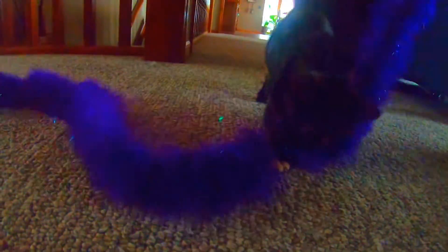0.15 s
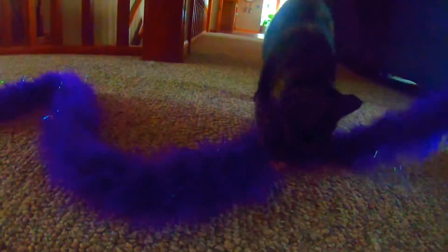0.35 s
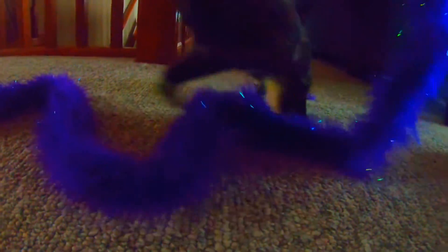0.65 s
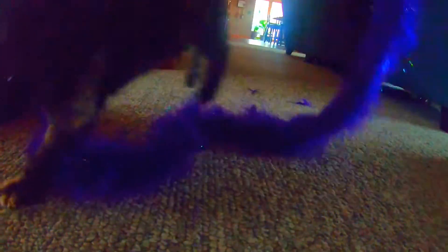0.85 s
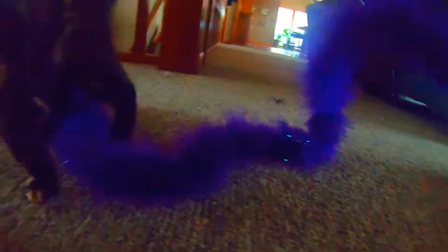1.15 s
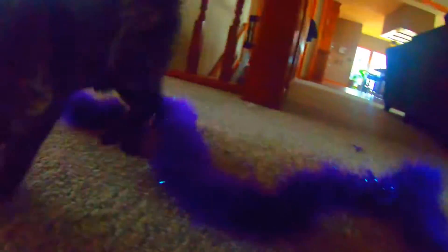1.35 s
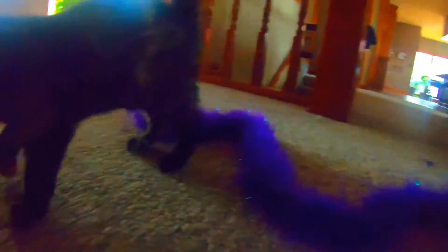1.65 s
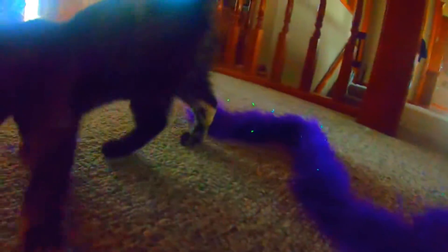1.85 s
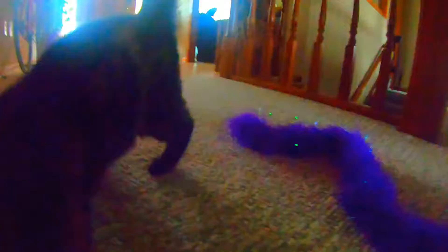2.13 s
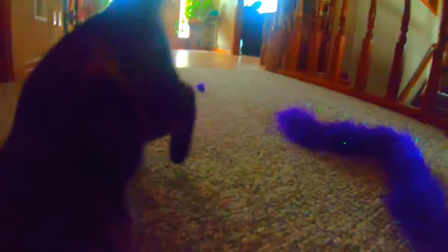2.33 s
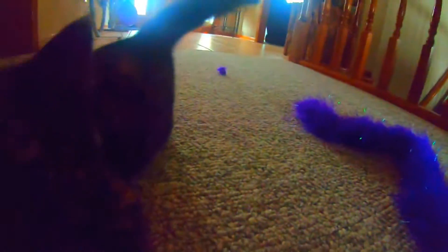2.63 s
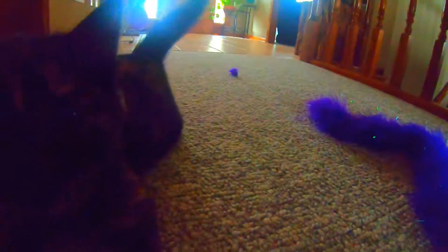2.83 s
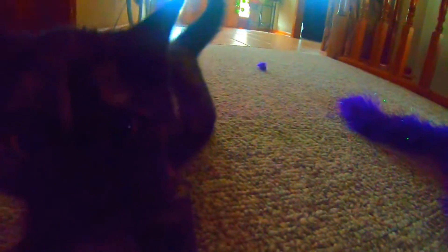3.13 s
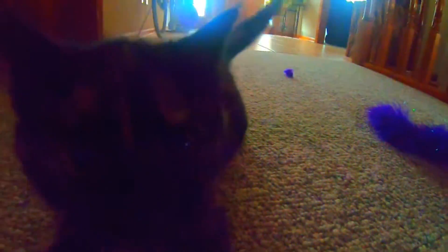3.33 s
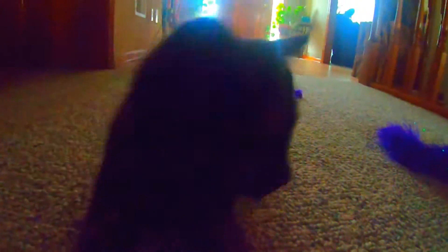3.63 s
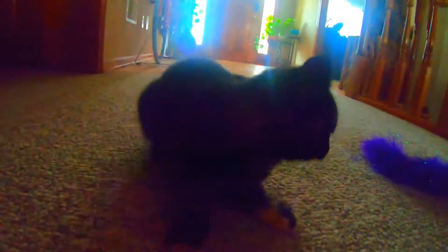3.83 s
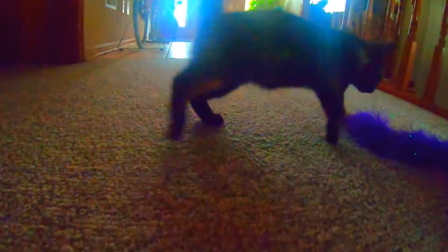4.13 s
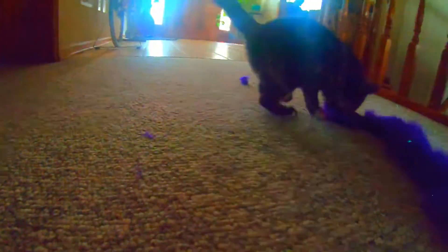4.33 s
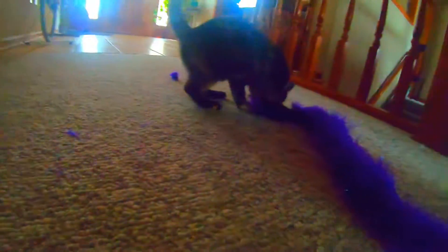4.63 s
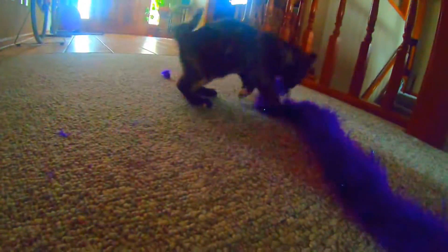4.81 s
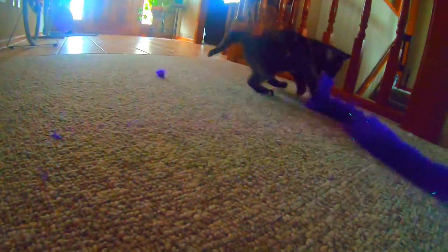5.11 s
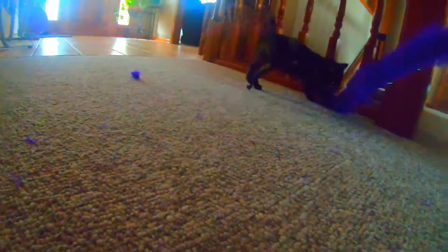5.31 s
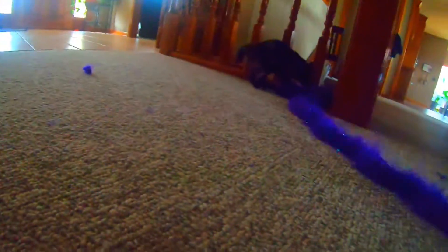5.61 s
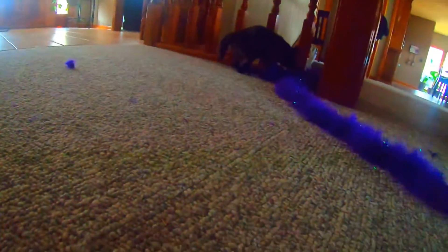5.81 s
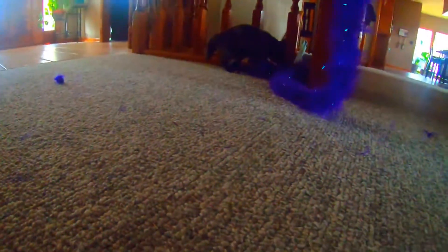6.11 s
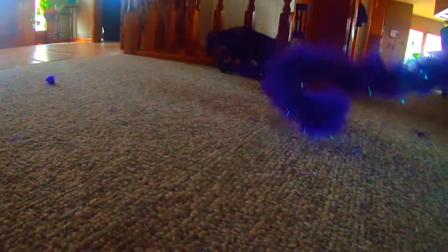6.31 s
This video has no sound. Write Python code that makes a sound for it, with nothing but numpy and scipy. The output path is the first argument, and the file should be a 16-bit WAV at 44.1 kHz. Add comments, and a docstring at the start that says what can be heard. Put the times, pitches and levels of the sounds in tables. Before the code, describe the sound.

Soft paw thumps and carpet scratches from a playing kitten, with close rubs and bumps on the microphone midway and a low household hum.

```python
"""Soft paws thud and scuff on carpet as a kitten chases a feather boa: claws snag the loops and the
boa zips over the ribs of the weave. It is all heard from a small camera held at floor level.
The kitten comes right up to it: fur and whiskers tap and rub the case, rasp over the microphone
ports and shove the camera in the hand. Then feathers rustle and the paws thud on.
Under it all the house hums."""
import sys
import numpy as np
from scipy import signal
from scipy.fft import rfft, irfft, next_fast_len
from scipy.io import wavfile

SR = 44100
rng = np.random.default_rng(int(sys.argv[2]) if len(sys.argv) > 2 else 0)


def unload_wav(signal):
    """Save mono or channel-first audio to the path in sys.argv[1] as 16-bit WAV at rate SR, clipped to [-1, 1]."""
    wavfile.write(
        sys.argv[1],
        SR,
        np.round(np.clip(np.atleast_2d(signal).T, -1, 1) * 32767).astype(np.int16),
    )


N = 284896
TIME = np.arange(N) / SR
ANTIPHASE = np.array([[1], [-1]])  # left and right in opposite polarity

# Levels in the tables are relative: each layer adds its own gain.
# Fur and whiskers tapping the case. Each row: start in seconds, knock level in dB, tick level in dB,
# tilt of the tick in dB per octave.
CASE_TAPS = [(2.2225, -46, -59, 4.5), (2.3395, -46, -56.5, 0.5), (2.3675, -33.5, -69.5, -1.5),
             (2.495, -46, -60, 9), (2.5215, -44, -71, -0.5), (2.6589, -42.5, -65, 0.5),
             (2.7138, -25, -60.5, 3), (2.7158, -41, -41, -2), (2.7328, -47.5, -64.5, 7),
             (2.778, -43.5, -64.5, -6), (2.7862, -35.5, -50, -21), (2.815, -42, -59.5, -2),
             (2.835, -46, -64, -4), (2.853, -45, -62, -8.5), (2.873, -45, -55, -11),
             (2.8925, -37, -55.5, -8.5), (2.909, -48, -62.5, -3), (2.923, -40.5, -56, -11),
             (2.937, -42.5, -72.5, -4), (2.985, -46.5, -61.5, -3), (3.02, -46, -68.5, -2),
             (3.033, -52.5, -68, -1.5), (3.134, -46, -66, -7), (3.364, -35.5, -57.5, -2),
             (3.4167, -41, -47.5, -3.5), (3.4268, -22.5, -23.5, 0.5), (3.4283, -25, -28, 2),
             (3.4395, -25.5, -46, -7), (3.4455, -36, -39.5, 0.5), (3.4595, -35.5, -52, -4),
             (3.527, -43.5, -62, -4), (3.534, -51, -59, 0), (3.549, -39, -64.5, 7), (3.564, -51.5, -55, -1),
             (3.569, -36.5, -57.5, 0), (3.58, -45, -63, 6.5), (3.603, -49.5, -68, 0),
             (3.612, -39.5, -66.5, -2), (3.619, -34.5, -61, 0), (3.626, -40.5, -59.5, 0),
             (3.646, -34.5, -70, -5), (3.654, -49, -52.5, -5.5), (3.66, -45.5, -59.5, 1),
             (3.669, -42.5, -64, -3), (3.6955, -36.5, -51.5, 0.5), (3.726, -40.5, -54.5, -2),
             (3.749, -37, -51.5, -1), (3.7527, -39, -53, 0), (3.7718, -28, -44.5, -2.5),
             (3.778, -27, -30.5, -3), (3.8101, -40, -55.5, 0), (3.8385, -28, -43.5, -8),
             (3.843, -25.5, -37, -1.5), (3.859, -27, -52, -4), (3.87, -28, -46, -3),
             (3.874, -28, -39.5, -3.5), (3.8842, -28.5, -51.5, -8), (3.94, -46, -70, 1),
             (4.538, -46, -64.5, -2), (4.653, -48.5, -62.5, 3.5)]
# Soft pads knocking on the case. Each row: start in seconds, level in dB.
PAD_KNOCKS = [(1.728, -50), (2.7168, -30), (4.356, -44), (4.506, -53), (4.604, -50), (5.308, -38),
              (5.412, -40.5), (5.856, -43.5), (5.9715, -37.5), (6.322, -42)]
# Fur and fingers sliding on the case. Each row: start and length in seconds, ring and hiss levels in dB.
CASE_RUBS = [(1.55, 0.036, -68, -67), (1.68, 0.071, -62, -81), (1.8, 0.13, -65.5, -90),
             (1.81, 0.047, -84, -70), (2.3, 0.1, -52, -58.5), (2.4, 0.059, -51.5, -67),
             (2.47, 0.057, -46.5, -60), (2.56, 0.27, -55.5, -70), (2.708, 0.029, -38, -46.5),
             (2.755, 0.026, -57, -68.5), (2.8, 0.19, -57.5, -77), (3.3, 0.029, -65, -73),
             (3.325, 0.13, -44, -54), (3.408, 0.035, -35.5, -43), (3.445, 0.021, -49.5, -40.5),
             (3.525, 0.16, -54.5, -69), (3.74, 0.1, -54, -75), (3.845, 0.034, -39, -55.5),
             (4.0, 0.055, -62.5, -76.5), (4.18, 0.21, -61.5, -83.5), (4.45, 0.32, -60, -72),
             (4.515, 0.07, -51, -64), (4.63, 0.026, -57, -66), (4.76, 0.074, -55.5, -71),
             (4.83, 0.15, -62.5, -89.5), (5.3, 0.18, -63, -72), (5.52, 0.18, -73.5, -78),
             (5.755, 0.028, -59.5, -76), (5.85, 0.083, -69, -74), (6.008, 0.04, -55.5, -73),
             (6.07, 0.14, -74.5, -72)]
# The kitten shoving the camera. Each row: start in seconds, level in dB, pitch in Hz,
# seconds to die away by 60 dB.
CAMERA_SHOVES = [(2.31, -30.5, 27, 0.8), (2.76, -32, 29.7, 1), (3.11, -25.5, 23, 0.27),
                 (3.4275, -5.5, 112, 0.03), (3.441, -14, 115, 0.026), (3.457, -17.5, 27.5, 0.12),
                 (3.778, -31, 36.7, 0.57), (3.843, -21, 36.3, 0.068), (3.876, -20, 26.96, 0.22),
                 (3.97, -26, 20.7, 1)]
# Fur crossing the microphone ports. Each row: start and length in seconds, level in dB.
PORT_SWEEPS = [(3.324, 0.083, -63.5), (3.403, 0.021, -46.5), (3.438, .019, -42), (3.459, 0.019, -36.5),
               (3.484, 0.0093, -44.5)]
# Paws landing on carpeted floorboards. Each row: start in seconds, level in dB, pitch in Hz.
PAW_LANDINGS = [(.134, -35.5, 122.6), (0.211, -38.5, 137), (0.558, -37, 170.5), (.976, -27.5, 162),
                (1.089, -32, 171), (1.139, -34.5, 165), (1.296, -34.5, 163), (1.86, -37.5, 146),
                (2.102, -36, 159), (2.222, -34, 165), (2.29, -30.5, 88.3), (2.2936, -22.5, 197.5),
                (2.736, -31.5, 166), (2.803, -31.5, 121.6), (3.425, -31.5, 153), (3.838, -33, 186.6),
                (4.003, -39, 163), (4.772, -36.5, 117), (5.119, -32.5, 100), (5.151, -29, 83.6),
                (5.177, -33.5, 115), (5.221, -39, 132), (5.264, -21, 114.5), (5.296, -25, 77.5),
                (5.335, -28, 88.2), (5.359, -30, 84.9), (5.397, -28.5, 87), (5.429, -30, 90.8),
                (5.667, -32, 83.2), (5.713, -36, 80.9)]
# Claws, pads and feathers catching in the carpet. Each row: start in seconds, level in dB, pitch in Hz,
# width in octaves, length in seconds.
CARPET_SNAGS = [(.13, -61, 5500, 1.5, 0.02), (.203, -55, 3000, 1.1, 0.019), (.21, -52, 926, 0.59, 0.035),
                (.222, -53.5, 750, 0.78, 0.0037), (.56, -57.5, 1105, 0.95, 0.008),
                (.727, -52, 1495, 0.97, 0.0036), (.768, -54.5, 2056, 0.64, 0.0057),
                (.77, -50, 7670, 1.1, 0.0017), (.976, -50, 659, 0.35, 0.01), (1.087, -48, 330, .7, 0.008),
                (1.087, -60.5, 2690, 0.6, .004), (1.14, -50.5, 363, 0.62, 0.0055),
                (2.096, -60, 1110, 1.3, 0.0059), (2.116, -52.5, 860, 0.33, 0.0022),
                (2.168, -49.5, 663, 0.32, 0.0028), (2.104, -56, 1300, 1.1, 0.018),
                (2.183, -53, 1696, 0.9, 0.023), (2.218, -38.5, 520, 1.5, 0.0053),
                (2.22, -45, 1620, 0.16, .003), (2.221, -44, 3140, 0.37, 0.0025),
                (2.253, -54.5, 2990, 0.57, 0.0017), (2.284, -61.5, 3200, .5, .0015),
                (2.294, -35, 394, 0.6, 0.006), (2.296, -49, 2300, 0.83, 0.0071),
                (2.705, -50, 1420, 1.4, 0.0064), (2.712, -39, 400, 0.52, 0.009),
                (2.7328, -41.5, 2600, 0.68, 0.0018), (2.733, -37, 481, 0.66, 0.0036),
                (4.131, -54.5, 1510, 1.04, 0.003), (4.78, -55.5, 2540, 1.3, 0.025),
                (5.028, -71, 3300, .6, 0.0012), (5.033, -53, 1880, 0.96, 0.0018),
                (5.033, -47.5, 560, 1, 0.0044), (5.16, -51.5, 7420, 0.49, 0.046),
                (5.221, -56.5, 1510, 0.99, .005), (5.2805, -49.5, 1100, 0.74, 0.0035),
                (5.411, -64, 1800, .8, 0.0027), (5.52, -50, 952, 0.35, .004), (5.971, -61, 1800, .6, .002),
                (5.705, -54, 6790, .2, 0.0092), (6.163, -56, 2730, 0.16, 0.0031),
                (6.164, -57.5, 5950, 1.3, 0.0026)]
# Paws and toy scuffing the carpet. Each row: start and length in seconds, body and treble levels in dB.
CARPET_SCUFFS = [(0, 0.13, -76, -79), (.105, 0.067, -63, -72.5), (.19, 0.038, -57.5, -67),
                 (.255, 0.12, -73.5, -76), (.385, 0.07, -74.5, -72.5), (.46, 0.26, -76.5, -78.5),
                 (.71, 0.055, -69.5, -73.5), (.785, 0.086, -82, -67), (.87, 0.12, -70, -72.5),
                 (.95, 0.051, -63.5, -67), (1.02, .12, -68.5, -71), (1.15, 0.15, -65.5, -71.5),
                 (1.35, 0.045, -68, -66.5), (1.4, 0.06, -70, -77.5), (1.47, 0.11, -75, -77),
                 (1.6, 0.4, -79, -83.5), (2.095, 0.1, -68, -77), (2.215, 0.025, -74, -66.5),
                 (2.28, 0.16, -65, -75.5), (3.88, 0.15, -64, -91.5), (4.04, 0.098, -73.5, -92),
                 (4.365, 0.043, -66, -81), (4.49, 0.1, -73.5, -77), (4.6, 0.24, -72.5, -77.5),
                 (4.91, 0.19, -71.5, -79), (5.1, 0.12, -63, -70), (5.148, 0.046, -58, -64),
                 (5.205, 0.11, -63.5, -67.5), (5.315, 0.2, -77.5, -77.5), (5.62, 0.065, -72, -74.5),
                 (5.688, 0.053, -70.5, -66.5), (5.735, 0.42, -79.5, -79), (6.1, 0.048, -71, -69),
                 (6.175, 0.082, -69, -73), (6.25, 0.12, -74.5, -76.5), (6.38, 0.11, -75, -79)]
# Tugs on the boa. Each row: start and length in seconds, opening pitch in Hz, glide in Hz per second,
# level in dB.
BOA_TUGS = [(0.106, 0.087, 2450, 3, -64), (.195, 0.068, 2480, 0.5, -64), (0.253, 0.026, 2477, -1200, -52),
            (0.365, 0.036, 2356, 4500, -54.5), (.45, 0.17, 2540, -4.5, -67),
            (0.685, 0.027, 2380, 3004, -60.5), (.765, 0.051, 2400, 2498.5, -63.5),
            (0.807, 0.022, 2570, 7000.5, -55.5), (0.939, 0.069, 2625, 0, -64),
            (1.093, 0.031, 2950, 3500, -60.5), (1.172, 0.18, 2690, 1503, -67),
            (1.34, 0.025, 2950, 5003, -56.5), (1.41, 0.048, 2800, 0, -69), (5.593, 0.056, 2450, -3000, -62),
            (5.667, 0.13, 2290, 3, -73), (6.072, 0.063, 2910, -1500, -64), (6.225, 0.041, 2950, -2000, -75)]
# The kitten grabbing the feathers. Each row: start and length in seconds, level in dB.
FEATHER_GRABS = [(4.522, 0.029, -58), (4.61, 0.071, -57.5), (4.697, 0.11, -59)]
# Modes of the case. Each row: pitch and width in Hz, left and right levels in dB,
# phase lead of the left microphone in radians.
CASE_MODES = [(100, 74, 0.5, 1, 5), (372, 100, -8, -8.5, 3.0), (637, 380, -25, -15.5, 4),
              (1265, 100, 1.5, 1.5, 2.68), (1640, 260, -18, -17, -2.6), (2020, 390, -28, -16, 0.5),
              (3420, 470, -30, -23, 0.65), (4200, 320, -27, -22, 2.74), (4830, 830, -27, -20, -0.5),
              (5550, 350, -35, -21, 0.5), (6170, 450, -25.5, -21.5, 2.1), (7970, 500, -31.5, -18, 3.4),
              (9380, 910, -33.5, -47.5, 3), (9630, 350, -26, -39.5, 5.5)]
# Resonances of the two microphone ports. Each row: pitch and width in Hz, level in dB.
LEFT_PORT_MODES = [(4400, 600, -4.5), (6400, 350, -1), (9600, 260, 8), (10200, 330, -6), (13930, 1100, -4)]
RIGHT_PORT_MODES = [(4800, 540, 1), (5500, 440, 10), (7460, 600, 5.5), (8200, 380, 1), (10600, 740, -5.5),
                    (12800, 2000, -18)]
# The hum of the house. Each row: pitch in Hz, level in dB.
HOUSE_HUM = [(42.5, -53), (184, -55)]
# EQ curves. Each row: frequency in Hz, gain in dB.
SCUFF_BODY_EQ = [(150, -14.5), (400, 6.5), (800, -1.5), (1300, -0.5), (2300, -2.5), (4200, -7), (6000, -14),
                 (9000, -32.5)]  # the midrange of carpet friction
SCUFF_TREBLE_EQ = [(2500, -15.5), (4500, -1.5), (6000, -5), (9700, -2.5), (12000, -8.5), (15000, -13.5)]  # its fizzy top
FEATHER_EQ = [(1000, -24), (2900, -20.5), (4200, 3.5), (5200, 1.5), (6200, -7), (7300, -16.5), (8250, 0),
              (9100, -9), (10400, -3.5), (14000, -17.5)]  # the airy colour of the feathers
AIR_EQ = [(12, -11.5), (22, 1), (42, 1), (60, -6.5), (110, -13), (150, -7), (190, -9.5), (240, -12.5),
          (310, -18), (600, -34.5), (790, -31), (1050, -42.5), (3000, -52.5), (9800, -60), (12000, -62)]  # the rumble of the room air
AIR_SIDE_EQ = [(20, -3), (45, -3), (110, -13), (200, -11), (380, -8.5), (700, 3), (1290, 8.5), (2400, 0.5),
               (4400, -5), (8000, 0)]  # its stereo width, side against mid
TREBLE_ROLLOFF_EQ = [(20, 0), (10200, -1.5), (11200, -11.5), (14300, -13.5), (15500, -17.5)]  # the treble falls away above 10 kHz


def whisker_taps(slip_s=0.00094, knock_slip=0.3, tick_slip=0.1, knock_gain_db=-0.5, tick_gain_db=-1.0):
    """Each tap flicks its own spot of the case, then slips briefly; the harder the tick, the quicker."""
    out, t = np.zeros((2, N)), TIME[:600]
    flick = t == 0
    usual_db = np.median([row[2] for row in CASE_TAPS])
    for start, knock_db, tick_db, tilt in CASE_TAPS:
        grit = rng.standard_normal(len(t))
        ring, treble = case_response(spot_db=2.5 * rng.standard_normal(len(CASE_MODES)))
        age = t / (slip_s * undb(0.22 * (usual_db - tick_db)))
        slip = grit * age * np.exp(1 - age)
        knock = drive(flick + knock_slip * slip, ring)
        tick = colour(drive(flick + tick_slip * slip, treble), [(3000, -tilt), (12000, tilt)])
        add(out, start, hit(knock, knock_db + knock_gain_db) + hit(tick, tick_db + tick_gain_db))
    return out


def case_response(spot_db=0, split_hz=2600):
    """The case's stereo impulse response as low ring and treble; the spot touched favours some modes."""
    t = TIME[:2048]
    out = np.zeros((2, len(t)))
    weights = undb(spot_db) * np.ones(len(CASE_MODES))
    for (hz, width, left_db, right_db, lead), weight in zip(CASE_MODES, weights):
        phase = 2 * np.pi * hz * t + np.array([[lead], [0]])
        out += weight * undb([[left_db], [right_db]]) * width * np.exp(-np.pi * width * t) * np.sin(phase)
    return cut(out, split_hz, "lowpass", order=4), cut(out, split_hz, "highpass", order=4)


def pad_knocks(rows, case_ring, soft_hz=1450, press_s=0.00092, creep=0.24):
    """A paw or fingertip presses and creeps a little, so only the case's low ring answers."""
    out, t = np.zeros((2, N)), TIME[:600]
    age = t / press_s
    for start, db in rows:
        force = (t == 0) + creep * rng.standard_normal(len(t)) * age * np.exp(1 - age)
        knock = cut(drive(force, case_ring), soft_hz, "lowpass", order=5)
        add(out, start, hit(knock, db))
    return out


def fur_rubs(case_ring, case_treble, ring_db=5, hiss_db=-1, loose_db=-8.5):
    """Hairs slip over the case and ring it; loose ones brush each microphone port directly."""
    ring_level, hiss_level = strokes(CASE_RUBS, attack_s=0.0044, release_s=0.015, swell=0.07)
    force = fibres(spread_db=3.6, count=24000)
    ring = unit(drive(force, case_ring))
    loose = unit(cut(stereo_fibres(spread_db=1), [3000, 11000], "bandpass"))
    hiss = unit(unit(drive(force, case_treble)) + undb(loose_db) * loose)
    flutter = drift(90)
    return ring * ring_level * undb(ring_db + 3 * flutter) + hiss * hiss_level * undb(hiss_db + 2 * flutter)


def camera_rocking():
    """A shove rocks the camera in the hand: a deep bump, mostly right, with the left in antiphase."""
    return bumps(CAMERA_SHOVES, push_s=0.0011, rough=0.062, rough_hz=200) * np.array([[0.2], [-1]])


def port_sweeps(flutter_db=2):
    """Fur rasps over the two ports, rings each in its own way and lets go abruptly."""
    t = TIME[:1024]
    level = sum(undb(db) * stroke(start, length, attack_s=0.0023, release_s=0.0026)
                for start, length, db in PORT_SWEEPS)
    rasps = []
    for modes in (LEFT_PORT_MODES, RIGHT_PORT_MODES):
        ring = sum(undb(db) * width * np.exp(-np.pi * width * t) * np.cos(2 * np.pi * hz * t)
                   for hz, width, db in modes)
        rasps.append(drive(fibres(spread_db=1, count=90000), ring[None])[0])
    return unit(np.array(rasps)) * level * undb(flutter_db * drift(250))


def paw_thuds(ring_cycles=14.5, gain_db=1.5):
    """Each landing sets a floorboard swinging; it dies away by 60 dB over ring_cycles swings."""
    landings = [(start, db, hz, ring_cycles / hz) for start, db, hz in PAW_LANDINGS]
    return undb(gain_db) * bumps(landings, push_s=0.0012, rough=0.14, rough_hz=261)


def carpet_snags(gain_db=-4, rise_s=0.00068, room_db=-27, room_s=0.12, skirt=2.75):
    """A claw, pad or feather catches in the yarn: a short rasp with a faint tail from the room."""
    out, t = np.zeros((2, N)), TIME[:4096]
    bins = np.maximum(np.fft.rfftfreq(len(t), 1 / SR), 1)
    mid, side = rng.standard_normal((len(CARPET_SNAGS) * len(t), 2)).T
    grits = airborne(mid, side, alike_hz=4980).reshape(2, -1, len(t))
    for k, (start, db, hz, octaves, length) in enumerate(CARPET_SNAGS):
        band = (1 + (np.log2(bins / hz) / octaves) ** 2 / skirt) ** -skirt
        rasp = irfft(rfft(grits[:, k]) * band)
        attack = 1 - np.exp(-t / rise_s)
        decay = np.exp(-(t / length) ** 2) + undb(room_db) * np.exp(-t / room_s)
        add(out, start, hit(rasp * attack * decay, db + gain_db))
    return out


def carpet_scuffs(flutter_db=1):
    """Pads and feathers drag through the pile in uneven little slips."""
    body_level, treble_level = strokes(CARPET_SCUFFS, attack_s=0.0057, release_s=0.044, swell=0.31)
    flutter = undb(flutter_db * drift(80))
    slips = airborne(fibres(spread_db=2.8, count=16000), fibres(spread_db=2.5), alike_hz=5010)
    body = unit(colour(slips, SCUFF_BODY_EQ))
    treble = unit(colour(stereo_fibres(spread_db=1), SCUFF_TREBLE_EQ))
    return (body * body_level + treble * treble_level) * flutter


def boa_zips(half_width_hz=230, gain_db=-7.5, pan_right_db=4, stereo_width=0.67):
    """Strands skip over the carpet's ribs: a narrow band of noise that holds or glides with each tug."""
    out = np.zeros((2, N))
    strands = cut(rng.standard_normal((2, 2, N)), half_width_hz, "lowpass")
    attack_s, release_s = 0.027, 0.031
    for start, length, hz, glide, db in BOA_TUGS:
        envelope = stroke(start, length, attack_s, release_s)
        on = np.flatnonzero(envelope)
        pitch = hz + glide * np.minimum(TIME[on] - start, length + release_s)
        phase = 2 * np.pi * np.cumsum(pitch) / SR
        mid, side = unit(strands[0][:, on] * np.cos(phase) + strands[1][:, on] * np.sin(phase))
        add(out, start, (mid + stereo_width * side * ANTIPHASE) * envelope[on] * undb(db + gain_db))
    return out * undb([[-pan_right_db / 2], [pan_right_db / 2]])


def feather_rustles(left_db=-6, flutter_db=2):
    """Fine feathers slide over each other in airy swells."""
    level = sum(undb(db) * stroke(start, length, attack_s=0.018, release_s=0.015)
                for start, length, db in FEATHER_GRABS)
    barbs = unit(colour(stereo_fibres(spread_db=2), FEATHER_EQ))
    return barbs * level * undb(flutter_db * drift(60)) * undb([[left_db], [0]])


def grip_shifts(count=45, from_s=0.97, level_db=-62, scatter_db=1.5):
    """The hand shifts its grip in faint random taps. Each row: start in seconds, level in dB."""
    starts = rng.uniform(from_s, TIME[-1], count)
    return list(zip(starts, level_db + scatter_db * rng.standard_normal(count)))


def room_tone(air_db=-47.5, waver_db=2, wander_rad=0.92):
    """The bed: ventilation rumble with two wavering hum lines."""
    mid, side = colour(rng.standard_normal((2, N)), AIR_EQ)
    air = (mid + colour(side, AIR_SIDE_EQ) * ANTIPHASE) / np.std(mid)
    bed = air * undb(air_db + 0.47 * drift(3.057))
    for hz, db in HOUSE_HUM:
        level = np.sqrt(2) * undb(db + waver_db * drift(6.2))
        bed += level * np.sin(2 * np.pi * hz * TIME + wander_rad * drift(8.1))
    return bed


def bumps(rows, push_s, rough, rough_hz):
    """Soft pushes that each set a heavy body swinging, with a dull rustle in the swing."""
    out, t = np.zeros((2, N)), TIME[:SR // 2]
    rustle = unit(cut(rng.standard_normal((2, 2 * SR)), rough_hz, "lowpass"))
    for (start, db, hz, t60), i in zip(rows, rng.integers(0, SR, len(rows))):
        swing = np.sin(2 * np.pi * hz * t) + rough * rustle[:, i:i + len(t)]
        envelope = (1 - np.exp(-t / push_s)) * np.exp(-np.log(1000) * t / t60)
        add(out, start, swing * envelope * undb(db))
    return out


def fibres(spread_db, count=30000):
    """Fibres slipping one by one: tiny random clicks, a few louder than the rest."""
    sizes = undb(spread_db * np.minimum(rng.exponential(size=count), 5)) * rng.standard_normal(count)
    return unit(np.bincount(rng.integers(0, N, count), sizes, N))


def stereo_fibres(spread_db):
    """A separate fibre crackle for each microphone."""
    return np.array([fibres(spread_db) for _ in range(2)])


def stroke(start, length, attack_s, release_s):
    """Envelope of a sliding contact: it swells, holds to the end of its length and dies away."""
    out = np.zeros(N)
    i, j = int(max(start, 0) * SR), int((start + length + 8 * release_s) * SR)
    t = TIME[i:j] - start
    attack = np.sin(np.pi / 2 * np.clip(t / attack_s, 0, 1)) ** 2
    out[i:j] = attack * np.exp(-np.maximum(t - length, 0) / release_s)
    return out


def strokes(rows, attack_s, release_s, swell):
    """Low-band and high-band envelopes for a table of strokes; longer strokes swell more slowly."""
    low, high = np.zeros(N), np.zeros(N)
    for start, length, low_db, high_db in rows:
        power = stroke(start, length, attack_s + swell * length, release_s) ** 2
        low += power * undb(low_db) ** 2
        high += power * undb(high_db) ** 2
    return np.sqrt(low), np.sqrt(high)


def airborne(mid, side, alike_hz):
    """Sound through the air: alike at both microphones in the bass, wide in the treble."""
    return mid + cut(side, alike_hz, "highpass", order=1) * ANTIPHASE


def drift(rate_hz):
    """Smooth random modulation at rms 1."""
    steps = rng.standard_normal(2048)
    return unit(np.interp(TIME * rate_hz, np.arange(len(steps)), steps))


def drive(force, response):
    """Play a force through each channel of an impulse response."""
    return signal.oaconvolve(force[None].astype(np.float32), response.astype(np.float32), axes=-1)[:, :N]


def colour(x, curve):
    """Apply an EQ curve of (Hz, dB) points."""
    hz, db = np.transpose(curve)
    size = 2 * next_fast_len(x.shape[-1] // 2 + 1, real=True)
    bins = np.maximum(np.fft.rfftfreq(size, 1 / SR), 1)
    gain = undb(np.interp(np.log(bins), np.log(hz), db)).astype(np.float32)
    return irfft(rfft(x.astype(np.float32), size) * gain, size)[..., :x.shape[-1]]


def cut(x, hz, kind, order=2):
    """Butterworth filter."""
    return signal.sosfilt(signal.butter(order, hz, kind, fs=SR, output="sos"), x + 1e-18)


def hit(x, db):
    """Scale a one-shot so that its energy, spread over 10 ms, has this level."""
    energy = np.mean(np.sum(x ** 2, axis=-1))
    return x * undb(db) / np.sqrt(energy / (SR / 100) + 1e-30)


def add(out, start, x):
    """Mix in a stereo one-shot at start seconds."""
    i = max(int(start * SR), 0)
    out[:, i:i + x.shape[-1]] += x[:, :N - i]


def unit(x):
    """Scale to rms 1."""
    return x / np.sqrt(np.mean(x ** 2) + 1e-30)


def undb(db):
    """Decibels to gain."""
    return np.exp(np.asarray(db) * (np.log(10) / 20))


def scene():
    """The mix: close contact with the camera, the chase on the carpet and the room tone."""
    case_ring, case_treble = case_response()
    chase = paw_thuds()
    contact = camera_rocking() + whisker_taps()
    contact += pad_knocks(PAD_KNOCKS + grip_shifts(), case_ring) + port_sweeps()
    chase += feather_rustles()
    contact += fur_rubs(case_ring, case_treble)
    chase += carpet_scuffs() + boa_zips() + carpet_snags()
    return contact + chase + room_tone()


def record(dry):
    """The high treble is dulled, and a steep low-pass cuts the top at 16 kHz."""
    top_cut = signal.ellip(8, 0.2, 70, 16000, fs=SR, output="sos")
    return signal.sosfilt(top_cut, colour(dry, TREBLE_ROLLOFF_EQ))


dry = scene()
out = record(dry)
unload_wav(out)
```